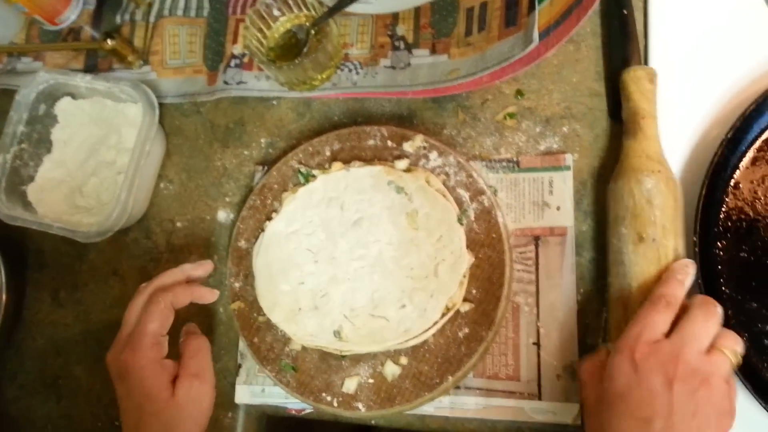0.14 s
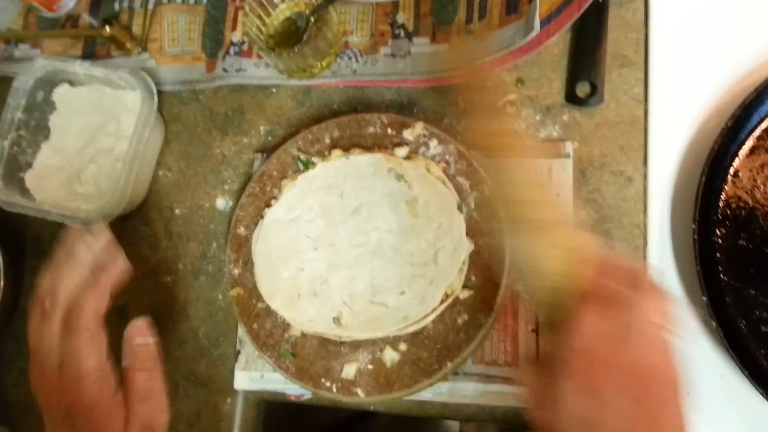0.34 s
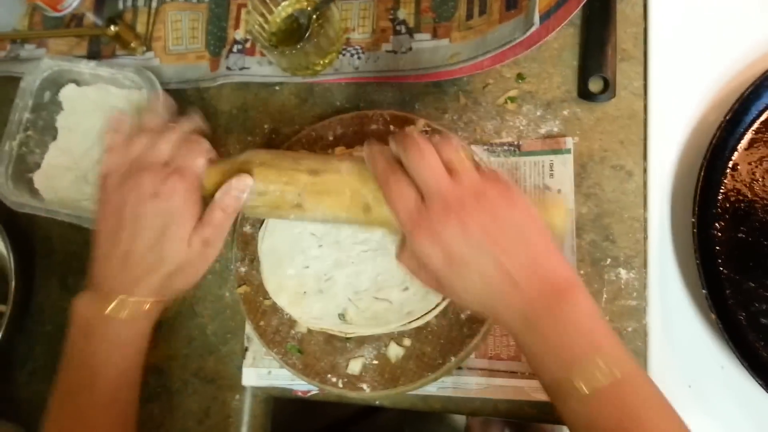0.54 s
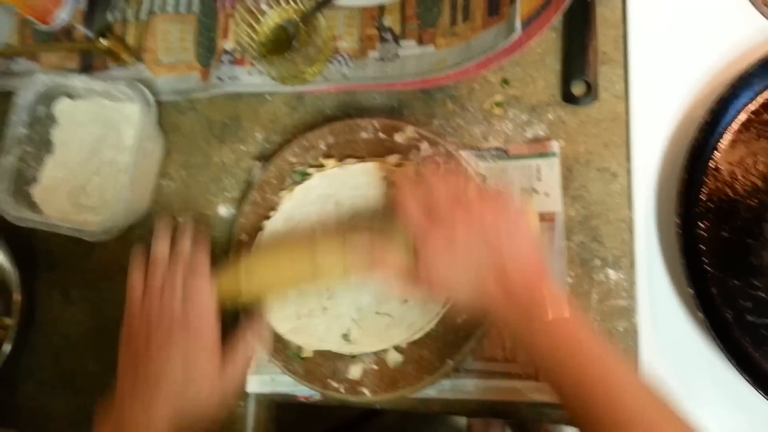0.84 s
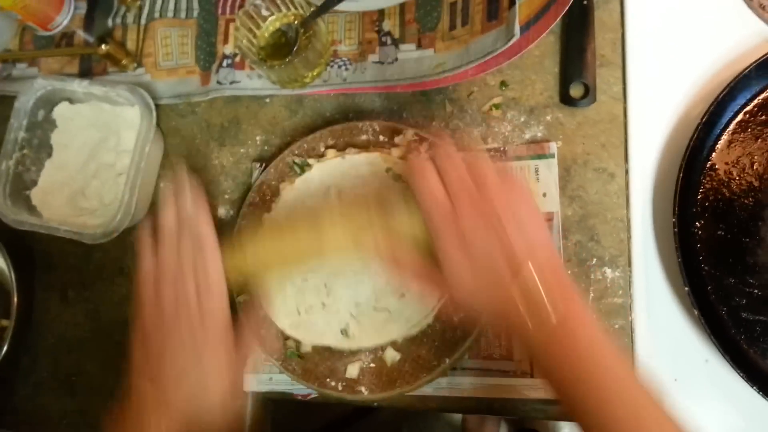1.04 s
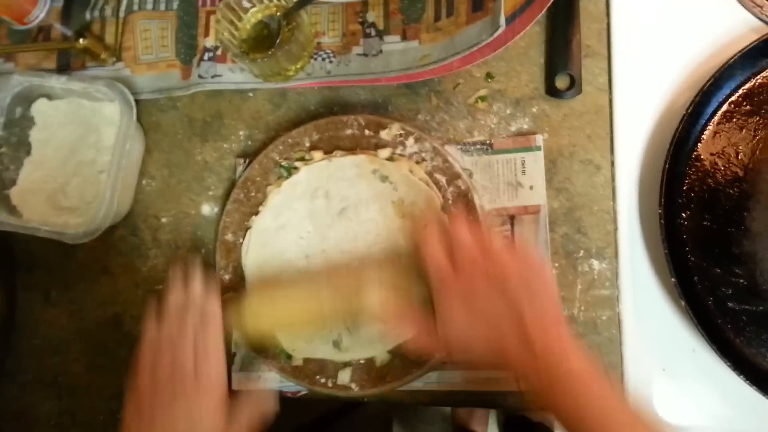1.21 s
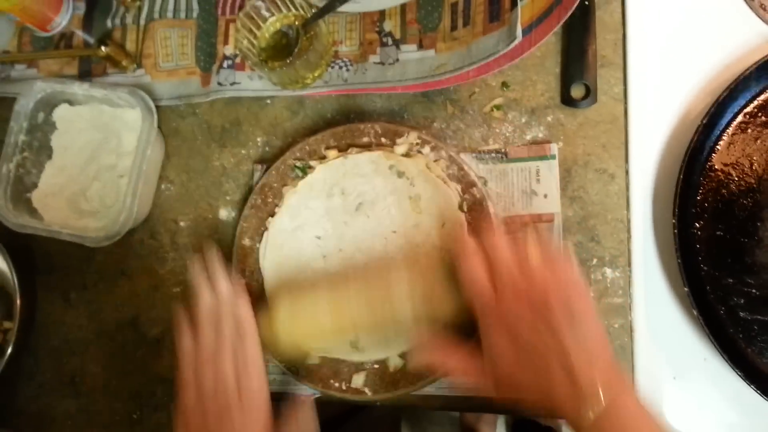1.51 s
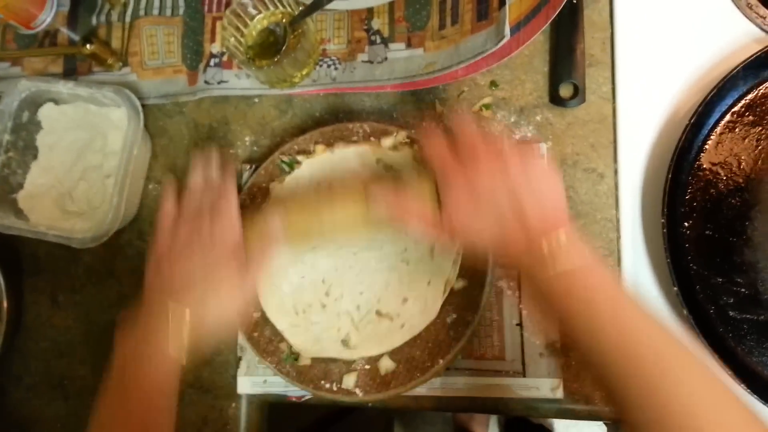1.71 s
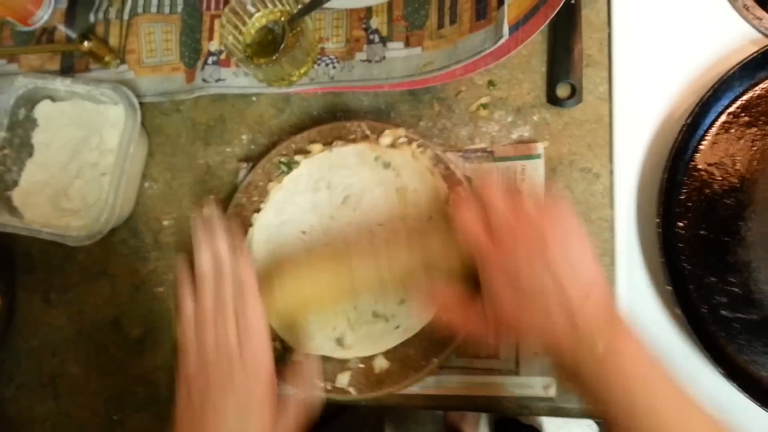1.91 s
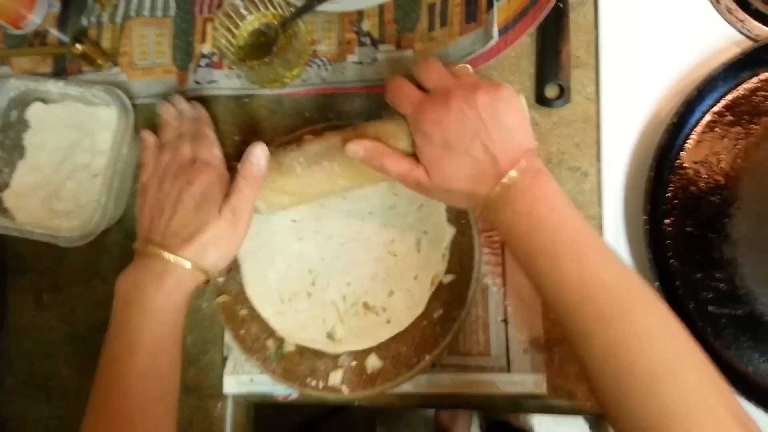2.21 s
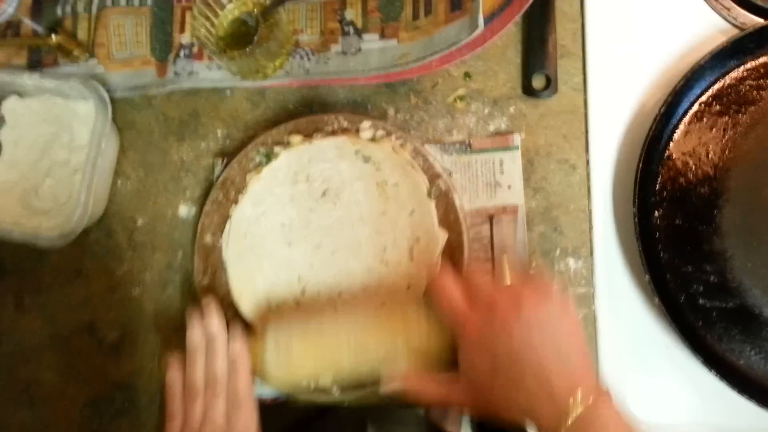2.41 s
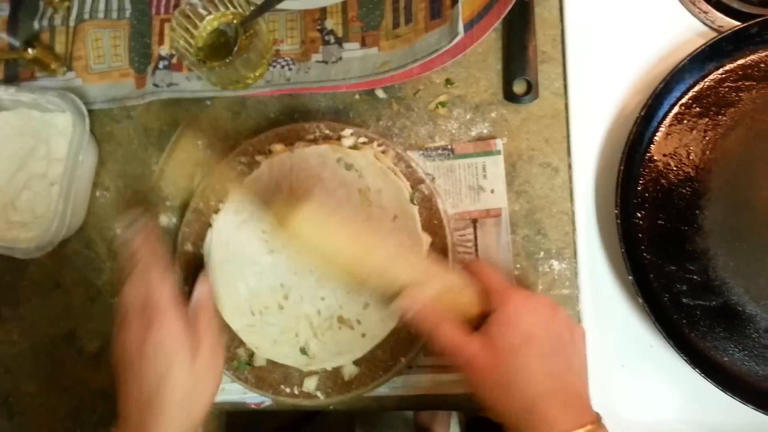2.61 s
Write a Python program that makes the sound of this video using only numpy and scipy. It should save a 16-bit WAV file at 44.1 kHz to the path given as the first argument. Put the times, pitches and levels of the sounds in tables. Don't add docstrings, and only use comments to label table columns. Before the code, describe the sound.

A wooden rolling pin is dragged and rattled off a worktop, with a bright, hard clack near 0.27 s and smaller ones until 0.35. It lands on the dough board with a dull knock at 0.68 s. From 0.75 to 2.5 s, dry, hissing palm strokes come about every 0.2 s, with low rumble, soft knocks at 1.1, 1.5 and 2.35, and tiny ticks. Close, small kitchen, faint low hum.

```python
import sys
import numpy as np
from scipy import signal
from scipy.fft import rfft, irfft
from scipy.io import wavfile
from scipy.ndimage import uniform_filter1d

SR = 44100
rng = np.random.default_rng(int(sys.argv[2]) if len(sys.argv) > 2 else 0)


def log_audio(samples):
    frames = np.atleast_2d(samples).T
    limited = np.clip(frames, -1, 1)
    pcm = np.round(limited * 32767).astype(np.int16)
    wavfile.write(sys.argv[1], SR, pcm)


def gain_from_db(level_db):
    decades = np.asarray(level_db, float) / 20
    return 10 ** decades


N = 121275

# pitch_hz, density_db [dB per Hz]
ROOM_TONE_SPECTRUM = [(18, -42.5), (30, -7.5), (311, 2), (786, -16), (1100, -17), (3230, -28.5),
                      (7170, -20.5), (11100, -29), (14000, -29)]
# pitch_hz, level_db
FRIDGE_LINES = [(58, -73), (162, -64.5), (310, -68.5)]
# time_s, level_db
DRAG_LEVEL = [(0.03, -63), (0.09, -43), (0.236, -35.5), (0.268, -41), (0.288, -48), (0.302, -35),
              (0.474, -50.5), (0.506, -53.5), (0.52, -47)]
# pitch_hz, density_db [dB per Hz]
DRAG_SPECTRUM = [(35, -54.5), (60, -18.5), (265, 1.5), (544, -13.5), (697, -7.5), (934, -19.5),
                 (2510, -21.5), (7240, -27), (13000, -53.5)]
# pitch_hz, level_db, t60_s
DRAG_MODES = [(1666, -1, .06), (2436, -7, 0.08), (5030, -7.5, .04)]
# fastest_s, rub_level_db, speeding_up_s, slowing_down_s, rumble_level_db
PALM_STROKES = [(0.573, -48, 0.03, 0.029, -70), (0.659, -47, 0.027, 0.022, -62),
                (0.748, -35.5, 0.039, 0.057, -33), (.9, -46.5, 0.02, 0.028, -43.5),
                (0.972, -31.5, 0.031, 0.041, -41.5), (1.163, -35.5, 0.053, 0.051, -42.5),
                (1.28, -47.5, 0.01, 0.032, -61), (1.358, -29.5, 0.025, 0.054, -41),
                (1.578, -35, 0.048, 0.051, -36.5), (1.792, -30.5, .045, 0.045, -39.5),
                (1.982, -32, 0.036, 0.067, -35.5), (2.193, -31, 0.038, 0.061, -38.5),
                (2.402, -32, 0.038, 0.077, -35)]
# start_s, level_db, fade_t60_s
FINGER_SLIDES = [(.048, -56, 0.33), (.1176, -53, 0.39), (.152, -50, .12), (0.165, -42.5, 0.3),
                 (0.234, -47.5, 0.25), (.2513, -37.5, 0.24), (.3356, -52, 0.29), (0.475, -53, 1),
                 (0.537, -50, 0.16), (0.553, -43, 0.14), (1.259, -49.5, 0.25)]
# pitch_hz, density_db [dB per Hz]
RUB_SPECTRUM = [(500, -51), (1100, -24), (2000, -19), (4000, -13.5), (6200, -7.5), (9000, -12.5),
                (12000, -17.5), (14800, -25)]
# pitch_hz, width_hz, level_db
RUB_RESONANCES = [(1640, 110, -19), (2460, 140, -15), (4300, 600, -15), (5050, 800, -5), (7000, 700, 0),
                  (7600, 900, -1)]
# start_s, level_db, damping_factor, favoured_pitch_hz [set by the struck spot]
PIN_CLACKS = [(.051, -48, .8, 1510), (.119, -42, 5, 1600), (.191, -31.5, 9, 2420), (.208, -32, 7, 1892),
              (.2662, -14.5, 1.9, 3430), (.268, -14.5, 3, 1680), (.2735, -22.5, 1.1, 2410),
              (.2815, -25.5, 1.2, 5000), (.288, -24, 0.56, 2470), (.3356, -25.5, 5, 2420),
              (.347, -23, 5.8, 4000), (.534, -34.5, 7.7, 3000)]
# pitch_hz, level_db, t60_s
PIN_MODES = [(1387, -8.5, 0.082), (1545, -7.5, 0.05), (1641, -3, 0.11), (1690, -7, 0.045),
             (2342, -6.5, 0.06), (2408, -6.5, 0.11), (2462, -0.5, 0.12), (3534, -11, 0.035),
             (4880, -3, 0.043), (5040, -5.5, 0.042), (6260, -17.5, 0.02), (7300, -18, 0.037),
             (8300, -15, .02), (9700, -18.5, 0.045)]
# start_s, level_db, press_and_rebound_ms
BOARD_KNOCKS = [(.084, -37.5, 4.6), (.119, -33.5, 1.8), (.138, -31.5, 3.7), (.103, -36, 3.6),
                (.185, -42.5, 3), (.226, -39, 3.8), (.283, -30.5, 4.6), (.343, -36, 3.3),
                (.543, -38.5, 0.97), (.6775, -27, 0.89), (.6845, -11.5, 2.66), (.694, -19, 13),
                (1.084, -25.5, 3.5), (1.09, -33, 8.8), (1.4915, -52, 0.17), (1.4975, -18, 2.6),
                (1.505, -32, 16.4), (1.532, -29, 2.4), (2.277, -26, 10.3), (2.3515, -22.5, 2.1),
                (2.358, -25, 7.4)]
# pitch_hz, level_db, t60_s
BOARD_MODES = [(62.3, -9, 0.088), (125, -3, 0.072), (176, -8, 0.054), (223.6, -10, 0.095), (315, -2, 0.085),
               (365, -13, 0.09), (459, -12.5, 0.06), (606, -13.5, 0.035), (700, -15.5, 0.04),
               (834, -15.5, 0.051), (1110, -19, .03)]
# start_s, level_db, pitch_hz, t60_s
WOOD_TICKS = [(.678, -34.5, 3020, .006), (.679, -31.5, 1530, 0.0096), (.682, -36, 2310, 0.0092),
              (.725, -31.5, 620, 0.032), (.925, -40.5, 1110, 0.025), (.95, -38.5, 1060, 0.036),
              (1.082, -42.5, 1090, 0.014), (1.305, -45, 2080, .012), (1.393, -40, 1000, .012),
              (1.397, -38.5, 1055, 0.02), (1.397, -36, 1950, .015), (1.406, -37.5, 1070, 0.014),
              (1.493, -41, 2300, 0.0087), (1.494, -36, 900, 0.011), (1.26, -48, 7200, .01),
              (.1195, -43, 2600, .008), (.209, -40.5, 1700, .01), (1.766, -35, 2480, 0.018),
              (1.912, -47, 945, 0.016), (2.035, -37, 1990, 0.014), (2.35, -43, 1520, 0.01)]
# pitch_hz, density_db [dB per Hz]
PALM_CONTACT_SPECTRUM = [(60, -6.5), (250, 4), (700, -10), (1200, -10.5), (3000, -20), (7200, -29.5),
                         (14000, -36.5)]
# start_s, level_db, pitch_hz
DOUGH_LUMPS = [(.54, -52, 60), (0.956, -38, 62.5), (1.02, -40, 58), (1.091, -34.5, 70), (1.311, -37, 60.5),
               (1.42, -37.5, 60), (1.532, -31.5, 60), (1.736, -36, 67.6), (1.788, -33.5, 72),
               (1.84, -35, 60), (1.945, -37, 64), (2.03, -38, 56.5), (2.169, -30.5, 63.4),
               (1.979, -41, 121.5), (2.281, -28, 70), (2.6, -54, 60), (2.421, -34, 65), (2.49, -39, 65)]
# pitch_hz, difference_db
PORTS_FOR_PALMS = [(60, -2), (110, 4), (200, 2.5), (370, 3.5), (680, 6.5), (1260, 1.5), (2310, 5.5),
                   (4240, 7.5), (7790, -7), (14300, -2)]
# pitch_hz, difference_db
PORTS_FOR_PIN = [(60, -6.5), (110, -0.5), (200, 6.5), (370, 2.5), (680, 11), (1260, 14), (2310, 5),
                 (4240, 8.5), (7790, 8), (14300, 18)]


def level(x, db):
    return x * gain_from_db(db) / np.sqrt(np.mean(x ** 2))


def shape(table):
    hz = np.maximum(np.arange(N // 2 + 1) * SR / N, 5)
    points = np.array(table)
    return np.interp(np.log(hz), np.log(points[:, 0]), points[:, 1])


def colour(x, table):
    return level(irfft(rfft(x) * gain_from_db(shape(table)), N), 0)


def mode(x, hz, t60):
    pole = np.exp((2j * np.pi * hz - np.log(1000) / t60) / SR)
    return signal.lfilter([1], [1, -pole], x).imag


def walk(rate):
    k = int(SR / rate)
    steps = np.repeat(rng.standard_normal(N // k + 1), k)
    smooth = uniform_filter1d(uniform_filter1d(steps, k), k)
    return level(smooth[:N], 0)


def pair(alike):
    shared, opposed = rng.standard_normal((2, N))
    c = np.clip(alike, 0, 1)
    return np.sqrt((1 + c) / 2) * shared + np.sqrt((1 - c) / 2) * opposed * np.array([[1], [-1]])


def speed(column):
    t = np.arange(N) / SR
    flatness = 2.3
    out = 0
    for row in PALM_STROKES:
        spread = np.where(t < row[0], row[2], row[3])
        out = out + gain_from_db(row[column]) * np.exp(-.5 * np.abs((t - row[0]) / spread) ** flatness)
    return out


def fade(t, start_s, level_db, t60_s):
    return gain_from_db(level_db - 60 * np.maximum(t - start_s, 0) / t60_s)


def hits(rows, modes, push, sign=-1):
    scatter_db, spot_db_per_octave = 3, -8
    out = np.zeros(N)
    chance = rng.standard_normal((len(rows), 16))
    for (start_s, level_db, how, *spot), share in zip(rows, chance):
        force, damping = push(how)
        x = np.zeros(SR // 2)
        x[:len(force)] = force
        y = 0
        for k, (hz, mode_db, t60) in enumerate(modes):
            spot_db = sum(spot_db_per_octave * abs(np.log2(hz / f)) for f in spot)
            gain = sign ** k * gain_from_db(mode_db + scatter_db * share[k] + spot_db)
            y = y + gain * mode(x, hz, t60 / damping)
        i = int(start_s * SR)
        y = y[:N - i]
        out[i:i + len(y)] += y * gain_from_db(level_db) / np.abs(y).max()
    return out


def bursts(rows, t60, low_hz, high_hz):
    t = np.arange(N) / SR
    env = sum(fade(t, start_s, db, t60) * (t >= start_s) for start_s, db, *_ in rows)
    band = signal.butter(2, [low_hz, high_hz], "band", fs=SR, output="sos")
    return env * level(signal.sosfilt(band, rng.standard_normal(N)), 0)


def small(rows, push_s):
    out = np.zeros(N)
    push = np.r_[np.hanning(max(int(push_s * SR), 3)), np.zeros(SR // 4)]
    for start_s, level_db, hz, t60 in rows:
        y = mode(push, hz, t60)
        i = int(start_s * SR)
        out[i:i + len(y)] += (y * gain_from_db(level_db) / np.abs(y).max())[:N - i]
    return out


def kitchen():
    t = np.arange(N) / SR
    hum = sum(gain_from_db(db + 6.5 + 2 * walk(12)) * np.sin(2 * np.pi * hz * t) for hz, db in FRIDGE_LINES)
    return colour(pair(0.44), ROOM_TONE_SPECTRUM) * gain_from_db(-57.5) + hum


def drag():
    t = np.arange(N) / SR
    roughness = rng.standard_normal(N)
    hum = sum(gain_from_db(db) * mode(roughness, hz, t60) for hz, db, t60 in DRAG_MODES)
    scrape = colour(roughness, DRAG_SPECTRUM) + level(hum, -16.5)
    path_db = np.interp(t, *np.array(DRAG_LEVEL).T, left=-90, right=-90)
    return scrape * gain_from_db(path_db - 3.5 + 2.0 * walk(69.75))


def slip():
    grains_per_s, scatter_db = 14000, 2
    noise = pair(0.18)
    slips = rng.random(N) < grains_per_s / SR
    return noise * slips * gain_from_db(scatter_db * rng.exponential(size=N))


def rub():
    t = np.arange(N) / SR
    wood = 0
    for hz, width_hz, db in RUB_RESONANCES:
        t60 = 1.254 / width_hz
        band = mode(mode(slip(), hz, t60), hz, t60)
        wood = wood + level(band, db + 3.5 * walk(150))
    catch_s = 0.0029
    slides = sum(fade(t, *row) * np.clip((t - row[0]) / catch_s, 0, 1) for row in FINGER_SLIDES)
    friction = level(colour(slip(), RUB_SPECTRUM) + level(wood, 1.5), 0)
    return friction * (speed(column=1) + slides)


def clacks():
    t = np.arange(N) / SR
    grip_s, grip_db = .299, -11
    chatter = bursts(PIN_CLACKS, 0.17, 1590, 6600) * gain_from_db(6.2 * walk(400))
    rattle = sum(gain_from_db(db) * mode(chatter, hz, t60 / 5) for hz, db, t60 in PIN_MODES)
    ring = hits(PIN_CLACKS, PIN_MODES, lambda damping: (np.array([1, 1, -1, -1]), damping))
    crack = gain_from_db(-25.5) * bursts(PIN_CLACKS, 0.076, 870, 5400)
    grip = gain_from_db(grip_db * np.clip((t - grip_s) * 400, 0, 1))
    return (ring + crack + gain_from_db(-44) * rattle) * grip


def press(ms):
    return np.gradient(np.hanning(max(int(ms * SR / 1000), 8))), 1


def knocks():
    blow = hits(BOARD_KNOCKS, BOARD_MODES, press, sign=1)
    return signal.lfilter(*signal.butter(1, 535, fs=SR), blow) * gain_from_db(1.5)


def thuds():
    return gain_from_db(-21.5) * bursts(BOARD_KNOCKS, 0.16, 130, 980) * np.array([[1], [-.3]])


def ticks():
    return small(WOOD_TICKS, push_s=0.00021)


def rest():
    t = np.arange(N) / SR
    from_s, to_s = .535, 2.55
    gate = np.clip((t - from_s) / 0.0035, 0, 1) * np.clip((to_s - t) / 0.019 + 1, 0, 1)
    return colour(pair(0.56), PALM_CONTACT_SPECTRUM) * gain_from_db(-52.5 + 1.5 * walk(29.89)) * gate


def lumps():
    return small([(*row, 0.17) for row in DOUGH_LUMPS], push_s=0.011)


def rumble():
    tilt_db_per_octave = -6
    motion = speed(column=4)
    load = pair(0.95) * gain_from_db(2.5 * walk(40)) * (motion + 1e-6)
    out = 0
    for hz, db, t60 in BOARD_MODES:
        out = out + gain_from_db(db + tilt_db_per_octave * np.log2(hz / 60)) * mode(load, hz, t60)
    return level(out, -2) * np.sqrt(np.mean(motion ** 2))


def ports(x, lag, table):
    side = np.array([[.5], [-.5]])
    delay = np.exp(-2j * np.pi * np.arange(N // 2 + 1) / N * lag * side)
    return irfft(rfft(x * np.ones((2, 1))) * gain_from_db(shape(table) * side) * delay, N)


def room(near):
    t = np.arange(SR // 2) / SR
    noise = rng.standard_normal((2, len(t)))
    tail = signal.lfilter(*signal.butter(2, 450, "high", fs=SR), noise)
    tail = tail * gain_from_db(-60 * t / 0.15) * (t > .002)
    tail = tail * gain_from_db(-5) / np.sqrt(np.sum(tail ** 2) / 2)
    return signal.fftconvolve(near.mean(axis=0)[None], tail, axes=1)[:, :N]


def scene():
    palms = rub()
    board = knocks() + rumble() + ticks() + lumps() + thuds()
    near = ports(palms + board + rest(), 3.75, PORTS_FOR_PALMS)
    near = near + ports(clacks() + drag(), -2.7, PORTS_FOR_PIN)
    return near + room(near) + kitchen()


def band_limit(x):
    return signal.sosfilt(signal.butter(12, 14920, fs=SR, output="sos"), x)


def record(dry):
    bass_cut = signal.butter(4, 48, "high", fs=SR, output="sos")
    top_cut = signal.ellip(8, .2, 70, 14560, fs=SR, output="sos")
    mix = signal.sosfilt(top_cut, signal.sosfilt(bass_cut, dry))
    return band_limit(mix)


dry = scene()
out = record(dry)
log_audio(out)
```